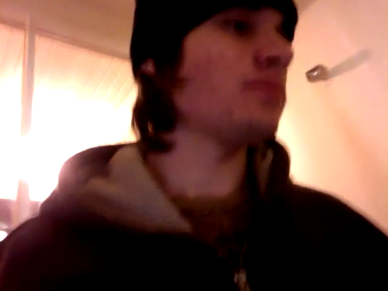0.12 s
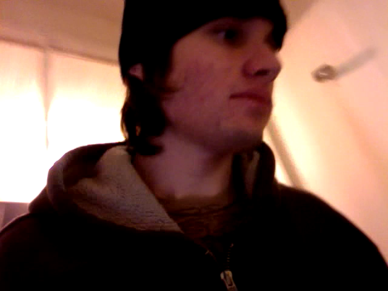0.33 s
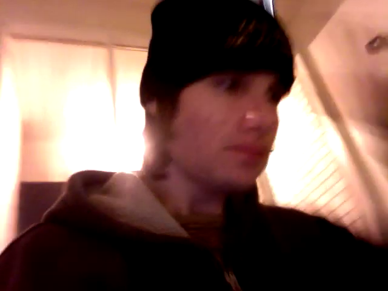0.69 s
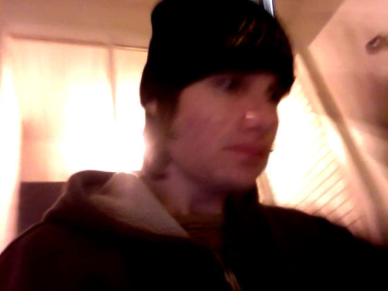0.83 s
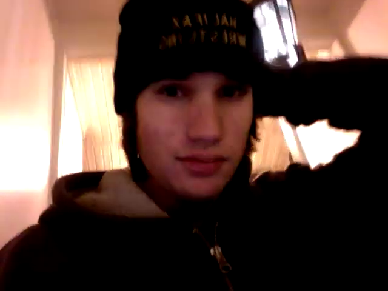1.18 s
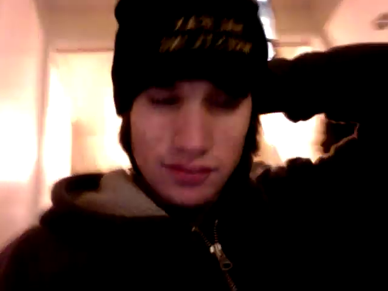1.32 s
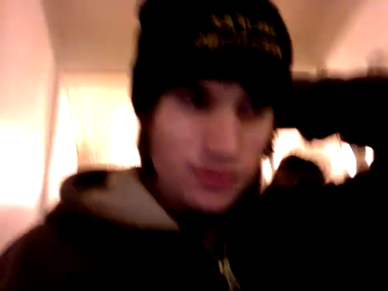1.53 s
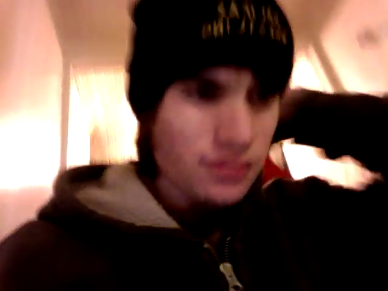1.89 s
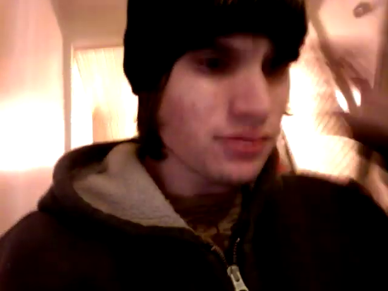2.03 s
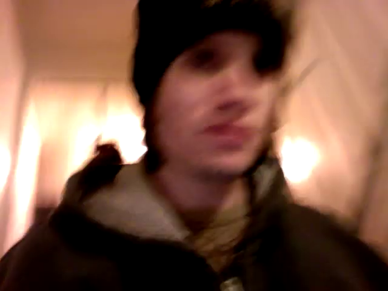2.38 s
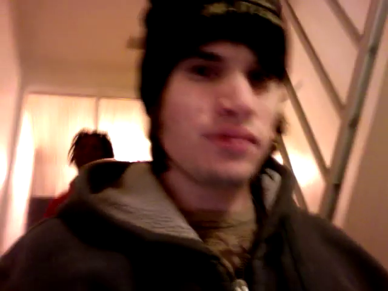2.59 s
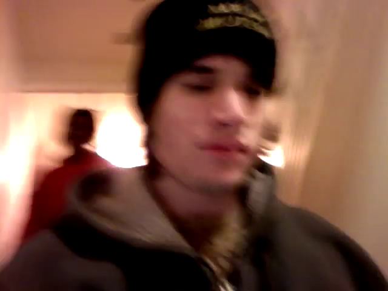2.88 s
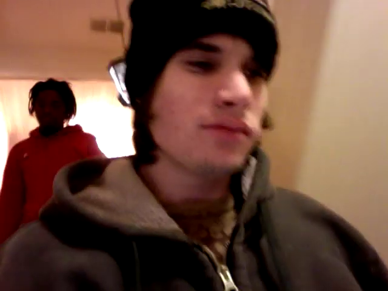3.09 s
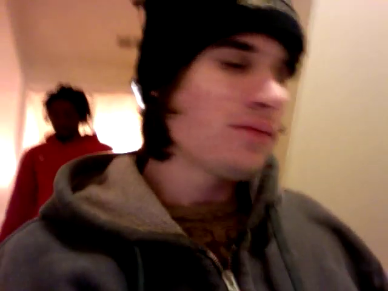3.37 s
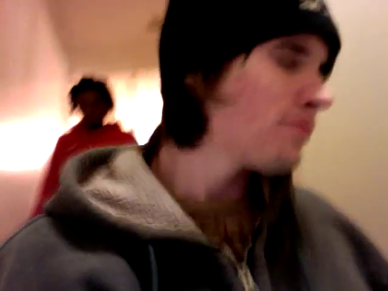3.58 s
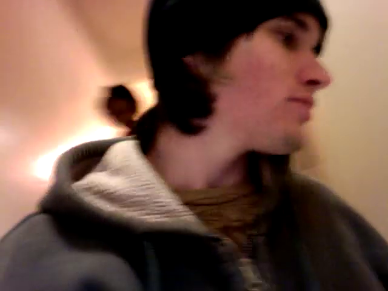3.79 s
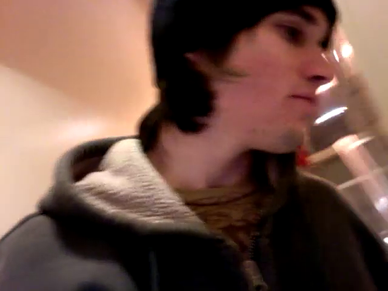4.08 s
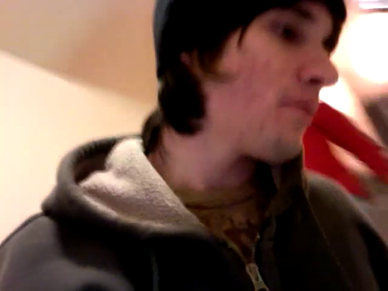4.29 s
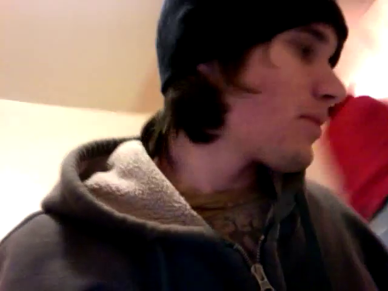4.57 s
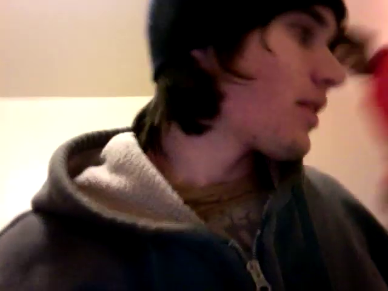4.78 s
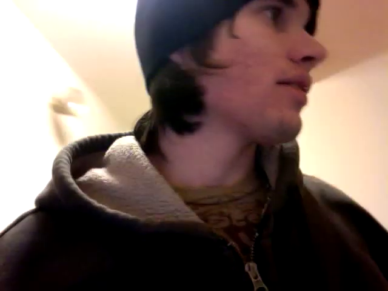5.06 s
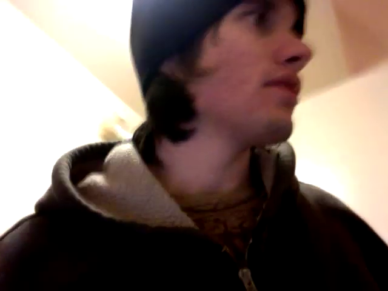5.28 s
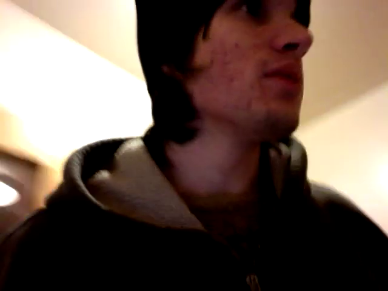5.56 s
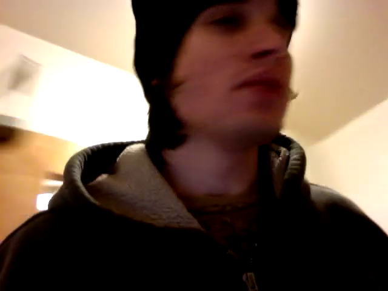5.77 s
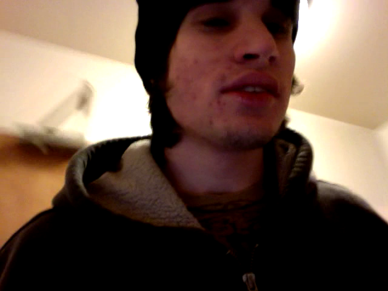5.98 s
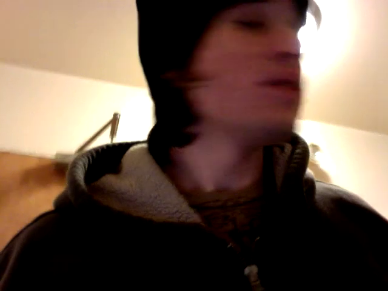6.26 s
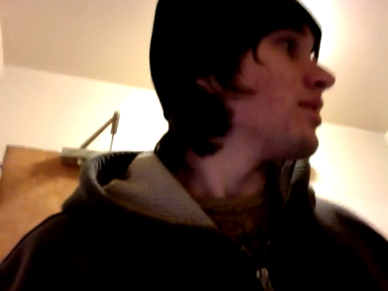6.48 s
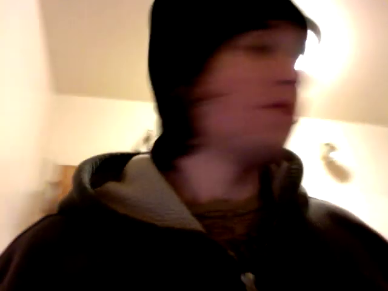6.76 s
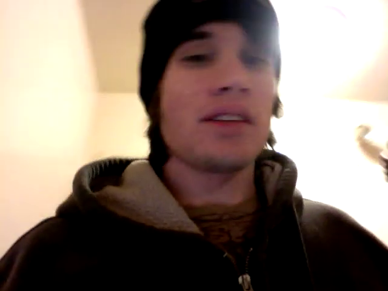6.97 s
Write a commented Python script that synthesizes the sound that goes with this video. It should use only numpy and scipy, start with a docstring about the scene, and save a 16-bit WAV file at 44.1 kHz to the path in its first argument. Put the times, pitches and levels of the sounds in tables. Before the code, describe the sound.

In a narrow bare wooden stairwell, a carried laptop's thin-bass microphone catches two people going down. Faint steady air and clothing rustle lie beneath everything. From 0 to 0.8 s, soft knocks cluster with a low squeak, a higher chirp and light scuffs, with a firmer thud at 0.7. Rasping soles drag around 1.1-1.3. A double knock lands at 1.9, cloth swishes, and a piercing high squeak cuts through at 2.2. Strong paired thumps follow at 2.7, with gritty crackles and a faint zip clink. Uneven steps continue from 3.1; quick chirps and fabric brushes gather near 4, then a click, the broadest swish at 4.45, another high squeak and a heavy low thud at 4.65. Steps tumble closer after 5.2; the loudest hard knock hits at 5.7. Lighter treads, scuffs and small dry ticks follow, ending with a swish and a step at 7.

```python
"""A narrow, bare wooden stairwell: two people go down, one of them carrying a laptop.
Heels ring damped tread modes, noise shudders follow, hard soles clack; filtered slips make scuffs and swishes.
Squeaks and chirps are rough tones, crunches are runs of cracks, case and zip tick, the zip pull clinks.
A decaying noise tail rings after all but the rustle and the faint air; the laptop's microphone thins the bass."""
import sys
import numpy as np
from scipy import signal
from scipy.fft import rfft, irfft, next_fast_len
from scipy.io import wavfile
from scipy.ndimage import uniform_filter1d

SR = 44100
rng = np.random.default_rng(int(sys.argv[2]) if len(sys.argv) > 2 else 0)


def to_wav(sig):
    """Store sig (one row per channel, or 1-D mono) as 16-bit WAV at the path in sys.argv[1].

    Samples outside -1..1 are clipped; the rate is SR.
    """
    pcm = np.clip(np.atleast_2d(sig), -1, 1) * 32767
    pcm = np.round(pcm).astype(np.int16)
    wavfile.write(sys.argv[1], SR, pcm.T)  # frames by channels


N = 314874

# event levels in all tables: loudest short-term rms, before reverberation, mix gain and microphone
# footfalls: [t/s, boom level/dB, boom focus f/Hz, clack level re boom/dB, settling time/s]
STEPS = [(.013, -37.5, 326, -10.5, 0.094), (.085, -35, 157, -8, 0.061), (.283, -33, 352, -14.5, .04),
         (.505, -35, 327, -31, 0.036), (0.599, -39, 204, -32, 0.51), (0.725, -25, 303, -22.5, 0.071),
         (.82, -37.5, 300, -16, .04), (1.071, -30.5, 186, -34, 0.05), (1.313, -26.5, 306, -14, 0.064),
         (1.880, -26, 290, -20, 0.025), (1.894, -26, 330, -23.5, .035), (2.289, -26, 324, -8.5, 0.097),
         (2.698, -22.5, 278, -10.5, 0.075), (2.765, -24.5, 365, -12, 0.088), (3.080, -33, 187, -11, 0.0074),
         (3.492, -25.5, 293, -20.5, 0.077), (3.60, -31, 216, -13.5, 0.13), (3.917, -31, 357, -16.5, 0.1),
         (4.062, -26, 297, -21, 0.075), (4.325, -33, 218, -15, 0.037), (4.647, -22, 158, -27, 0.033),
         (4.783, -33.5, 242, -20, 0.21), (5.177, -31, 190, -40, 0.0152), (5.27, -30, 234, -17, 0.085),
         (5.36, -30.5, 290, -24, 0.087), (5.722, -18, 450, -8.5, 0.079), (5.822, -25.5, 390, -28, 0.051),
         (5.978, -40.5, 500, -28, 0.026), (6.059, -34, 228, -6, 0.028), (6.393, -35.5, 277, -16, 0.046),
         (6.460, -31, 296, -19, 0.062), (6.545, -35.5, 250, -30, 0.079), (7.008, -28, 197, -15.5, 0.078)]
# rubbing spectrum: [f/Hz, density/dB per Hz]
RUB = [(200, 11), (600, 1.5), (1200, 2), (2500, 3.5), (4200, -1.5), (6000, -8), (8500, -17), (12000, -30.5),
       (15500, -47)]

TIME_S = np.arange(N) / SR
BLOW_S = np.arange(int(SR * .8)) / SR  # time axis of one event
PEAK_S = BLOW_S.mean()  # where a stroke peaks on it


def undb(db):
    """Decibels to gain."""
    return 10 ** (np.asarray(db) / 20)


def along(points, hz):
    """Read (Hz, value) points on a log-frequency axis."""
    f, value = np.transpose(points)
    return np.interp(np.log(hz + 1), np.log(f), value)


def bump(f, hz, width_oct, db):
    """Resonance in dB; width is from the centre to half its dB."""
    return db / (1 + (np.log2(f / hz) / width_oct) ** 2)


def colour(x, db_at):
    """Minimum-phase filter with a gain in dB given as a function of frequency."""
    size = 2 * next_fast_len(len(x))
    gain_db = db_at(np.arange(size // 2 + 1) * SR / size + 1)
    cepstrum = irfft(gain_db * np.log(10) / 20)
    # fold the cepstrum to make the filter causal
    cepstrum[1:size // 2] *= 2
    cepstrum[size // 2 + 1:] = 0
    return irfft(rfft(x, size) * np.exp(rfft(cepstrum)))[:len(x)]


def loudest(x, db, size=1024):
    """Scale so that the loudest stretch of size samples has this rms level."""
    peak_power = uniform_filter1d(x ** 2, size, mode="constant").max()
    return x * undb(db) / np.sqrt(peak_power)


def add(track, s, x):
    """Mix a sound into a track from time s on."""
    start = int(s * SR)
    x, start = x[max(-start, 0):], max(start, 0)
    track[start:start + len(x)] += x[:max(N - start, 0)]


def grains(count, spread_db):
    """Dense tiny impacts of unequal size."""
    size_db = spread_db * np.clip(rng.standard_normal(count), -2, 2)
    return rng.standard_normal(count) * undb(size_db)


def walk(count, rate_hz):
    """Random values, rate_hz of them a second, joined by straight lines."""
    position = np.arange(count) / SR * rate_hz
    return np.interp(position, np.arange(4096), rng.standard_normal(4096))


def decay(t60_s):
    """Exponential decay by 60 dB in t60_s."""
    return np.exp(-np.log(1000) * BLOW_S / t60_s)


def stroke(length_s, rise_share):
    """Pressure of a slide that catches quickly, peaks half-way through BLOW_S and dies away."""
    t = BLOW_S - PEAK_S
    rise_s = length_s * rise_share
    catch = 1 / (1 + np.abs(t / rise_s) ** 5.5)
    release = np.exp(-np.abs(t / (length_s - rise_s)) ** 1.12)
    return np.where(t < 0, catch, release)


def nearby(x, count=4, lag_min_s=.0003, lag_max_s=.003, echo_db=-13):
    """Lid, chest and wall comb a sound, differently each time because the laptop moves."""
    lags = (SR * rng.uniform(lag_min_s, lag_max_s, count)).astype(int)
    return x + undb(echo_db) * sum(np.pad(x, (lag, 0))[:len(x)] for lag in lags)


def air(level_db=-48.5, swell_db=1, swell_rate_hz=4.76):
    """Still air of the house and microphone hiss: coloured noise that swells gently."""
    # background spectrum: [f/Hz, density/dB per Hz]
    air_spectrum = [(30, -21), (90, -8.5), (200, 2.5), (450, -5), (1000, -15), (2000, -17.5), (4300, -21),
                    (7000, -36.5), (11000, -47), (15500, -60)]
    x = colour(rng.standard_normal(N), lambda f: along(air_spectrum, f))
    return x / x.std() * undb(level_db + swell_db * walk(N, swell_rate_hz))


def rustle(steady_db=-67, stir_db=-53.5, calm_s=0.077, flutter_db=2, flutter_rate_hz=25):
    """A sweatshirt brushes faintly near the microphone; every step stirs it and it calms again."""
    x = colour(grains(N, spread_db=3), lambda f: along(RUB, f))
    stir = sum((TIME_S > s) * np.exp(-np.abs(TIME_S - s) / calm_s) for s, *_ in STEPS)
    motion = undb(steady_db) + undb(stir_db) * stir
    return x / x.std() * motion * undb(flutter_db * walk(N, flutter_rate_hz))


def footfalls(toe_db=-7, shudder_db=-3, focus_db=4.0, detune=0.038, clack_rise_s=.0012, clack_s=0.049):
    """The heel rings a tread; the flight shudders while the sole settles; a hard sole clacks on top."""
    # tread and the hollow under it, before detuning: [f/Hz, level/dB, t60/s]
    tread_modes = [(107.7, -13, 0.29), (145.2, 2, 0.11), (211.3, -2.5, 0.097), (282.8, -2.5, 0.13),
                   (343.6, -7.5, 0.22), (427.4, -0.5, 0.039), (545, -20, 0.54), (679, -11.5, 0.12)]
    # shudder and hard-heel spectra: [f/Hz, density/dB per Hz]
    boom_spectrum = [(30, -36), (55, -11), (85, 5.5), (135, -12.5), (210, -1), (350, -0.5), (500, -7),
                     (700, -15), (1100, -29.5), (2500, -26), (6000, -66.5)]
    clack_spectrum = [(200, -23), (600, 22), (1000, 12), (1400, 12.5), (2300, 0.5), (4000, -5), (7000, -31),
                      (15000, -56)]
    # bass boost at the usual step level; harder steps gain boom faster than bass
    usual_step_db, usual_weight_db, weight_slope, weight_hz = -28, 1.5, 0.41, 130
    out = np.zeros(N)
    hz, mode_db, t60_s = np.transpose(tread_modes)[:, :, None]
    sign = (-1) ** np.arange(len(hz))[:, None]  # neighbouring modes swing against each other
    for s, db, focus_hz, clack_db, settle_s in STEPS:
        own_hz = hz * (1 + detune * rng.standard_normal(hz.shape))  # no two treads are alike
        modes = sign * undb(mode_db) * np.sin(2 * np.pi * own_hz * BLOW_S) * decay(t60_s)
        ring = np.sum(modes, axis=0)
        toe = int(SR * settle_s * rng.uniform(.3, .8))  # the ball of the foot lands after the heel
        ring = ring + undb(toe_db) * np.pad(ring, (toe, 0))[:len(ring)]
        ring = colour(ring, lambda f: -10 * np.log10(1 + (f / 800) ** 4))  # rubber rounds the blow

        settling = np.exp(-(BLOW_S / settle_s) ** 1.47)
        shudder = colour(grains(len(BLOW_S), spread_db=6.5) * settling, lambda f: along(boom_spectrum, f))

        # body weight drives the lowest modes; where the foot lands decides which range answers
        weight_db = usual_weight_db - weight_slope * (db - usual_step_db)
        boom = colour(loudest(ring, 0) + loudest(shudder, shudder_db),
                      lambda f: weight_db / (1 + (f / weight_hz) ** 4)
                      - focus_db * np.minimum(np.log2(f / focus_hz) ** 2, 4))

        contact = (1 - np.exp(-BLOW_S / clack_rise_s)) * np.exp(-BLOW_S / clack_s)
        clack = colour(grains(len(BLOW_S), spread_db=10.0) * contact, lambda f: along(clack_spectrum, f))
        add(out, s, loudest(boom, db) + loudest(clack, db + clack_db))
    return out


def squeal(length_s, hz, glide=0, rough_db=4.5, second_db=-21, third_db=-35, rise_share=0.37):
    """Stick-slip locks into a rough, unsteady tone with faint overtones; glide in octaves/s."""
    count = len(BLOW_S)
    waver = .056 * walk(count, rate_hz=2000) + .013 * walk(count, rate_hz=250)
    pitch_hz = hz * 2 ** (glide * np.clip(BLOW_S - PEAK_S, -length_s, length_s))
    phase = 2 * np.pi * np.cumsum(pitch_hz * (1 + waver)) / SR
    tone = np.sin(phase) + undb(second_db) * np.sin(2 * phase) + undb(third_db) * np.sin(3 * phase)
    return tone * undb(rough_db * walk(count, rate_hz=150)) * stroke(length_s, rise_share)


def squeaks():
    """Rubber soles squeak around one pitch while they drag and chirp as they flick free."""
    # held squeaks: [t at peak/s, length/s, level/dB, f/Hz]
    squeak_table = [(.12, 0.1, -35.5, 831), (0.543, 0.046, -30.5, 2270), (0.677, 0.05, -43, 2234),
                    (1.875, 0.084, -49, 4590), (1.872, 0.087, -48.5, 2920), (2.189, 0.15, -21, 4260),
                    (2.225, 0.012, -19.5, 4195), (2.267, 0.018, -20.5, 4204), (3.602, .06, -43, 2750),
                    (4.217, 0.045, -36, 1390), (4.394, 0.062, -39.5, 1123), (4.551, 0.16, -31.5, 4260)]
    # sweeping chirps: [t at peak/s, length/s, level/dB, f at peak/Hz, glide/octaves per s]
    chirp_table = [(3.941, 0.024, -33, 3325, -16.5), (3.992, .008, -44, 7450, 14),
                   (4.004, 0.0072, -38, 5500, -22)]
    out = np.zeros(N)
    for s, length_s, db, hz in squeak_table:
        add(out, s - PEAK_S, loudest(squeal(length_s, hz), db))
    for s, length_s, db, hz, glide in chirp_table:
        add(out, s - PEAK_S, loudest(squeal(length_s, hz, glide), db))
    return out


def slide(pressure, hz, peak_db, tilt_db, width_oct=0.36,
          judder_db=2, judder_rate_hz=160, shift_db=2, shift_rate_hz=45):
    """Sliding is a run of tiny slips, in uneven bunches, that ring one broad resonance."""
    count = len(BLOW_S)
    edges_hz = np.geomspace(400, 16000, 16)
    slips = np.zeros(count)
    # the patch in contact keeps changing, so each band comes and goes by itself
    for pair in zip(edges_hz, edges_hz[1:]):
        band = signal.butter(2, pair, "band", fs=SR, output="sos")
        part = signal.sosfilt(band, grains(count, spread_db=7.5))
        slips += part * undb(shift_db * walk(count, shift_rate_hz))
    slips = slips * undb(judder_db * walk(count, judder_rate_hz)) * pressure
    return colour(nearby(slips), lambda f: along(RUB, f) + bump(f, hz, width_oct, peak_db)
                  + tilt_db * np.log2(np.maximum(f / 1000, 1)))


def scuffs(rise_share=0.24):
    """A sole catches quickly and rasps around its own resonance."""
    # soles on treads: [t at peak/s, length/s, level/dB, resonance f/Hz, resonance/dB,
    # tilt above 1 kHz/dB per octave]
    scuff_table = [(0.125, 0.09, -32.5, 1490, 19.5, 5.5), (0.542, 0.05, -32.5, 1900, 18, -1.5),
                   (.555, 0.1, -37.5, 5500, 9, 1), (0.673, 0.046, -42.5, 4800, 2, 1),
                   (1.082, 0.05, -29.5, 2310, 6, -6), (1.217, 0.052, -27.5, 1570, 14.5, 0.5),
                   (1.245, 0.17, -28, 1880, 20.5, -2), (3.266, 0.058, -37.5, 2930, 16, 0.5),
                   (3.943, 0.017, -34, 3220, 16, 7), (3.975, 0.046, -36, 2280, -2, -1.5),
                   (4.205, 0.041, -36.5, 1310, 30, 10.5), (5.297, 0.12, -33.5, 1360, 7.5, -8),
                   (5.381, 0.071, -33.5, 2450, 8, 0.5), (5.717, 0.045, -27, 1340, 10, -4),
                   (5.866, 0.025, -33.5, 1330, 13, -3.5), (6.105, 0.027, -29, 1410, 19, 2)]
    out = np.zeros(N)
    for s, length_s, db, hz, peak_db, tilt_db in scuff_table:
        rasp = slide(stroke(length_s, rise_share), hz, peak_db, tilt_db)
        add(out, s - PEAK_S, loudest(rasp, db))
    return out


def swishes(rise_share=0.34, cloth_hz=2860, cloth_db=2.5):
    """Cloth slides on cloth as a limb swings: a slower swell with hardly any resonance."""
    # clothes: [t at peak/s, length/s, level/dB, tilt above 1 kHz/dB per octave]
    swish_table = [(0.293, 0.065, -42.5, -0.5), (0.668, 0.11, -35, -2), (1.913, 0.07, -46, -0.5),
                   (2.053, 0.14, -29, 0), (2.21, 0.24, -29.5, 4), (2.386, 0.058, -31, -3),
                   (2.79, 0.2, -48, 9), (3.632, 0.07, -34, 3), (4.021, 0.073, -31.5, 5.5),
                   (4.088, 0.072, -31.5, -1), (4.456, 0.12, -25, 2.5), (4.822, 0.096, -32, -0.5),
                   (4.919, 0.11, -39, -0.5), (6.098, 0.057, -33, 3.5), (6.5, .1, -41, -0.5),
                   (6.613, 0.042, -31.5, 2), (6.97, 0.15, -29.5, 1.5), (7.033, 0.19, -42.5, 7)]
    out = np.zeros(N)
    for s, length_s, db, tilt_db in swish_table:
        swish = slide(stroke(length_s, rise_share), cloth_hz, cloth_db, tilt_db)
        add(out, s - PEAK_S, loudest(swish, db))
    return out


def crunches(rate_hz=220, crack_s=0.0013, slope_db=9, spread_db=4):
    """Grit and joints under a loaded foot: separate little cracks, weakening as it comes to rest."""
    # crunches: [t/s, length/s, level/dB, f/Hz]
    crunch_table = [(1.054, 0.036, -33, 1090), (2.716, 0.11, -37, 2060), (2.792, 0.047, -39, 2730),
                    (4.021, .04, -37.5, 3480), (4.074, 0.037, -37.5, 2700), (5.367, 0.086, -40.5, 2390),
                    (5.736, 0.049, -46, 2220)]
    out = np.zeros(N)
    count = len(BLOW_S)
    for s, length_s, db, hz in crunch_table:
        cracks = (rng.random(count) < rate_hz / SR) * undb(spread_db * rng.standard_normal(count))
        cracks[0] = 1
        cracks = cracks * np.exp(-(BLOW_S / length_s) ** 2)
        bursts = signal.lfilter([1], [1, -np.exp(-1 / (crack_s * SR))], cracks)  # each crack decays
        crunch = colour(bursts * rng.standard_normal(count),
                        lambda f: -slope_db * np.minimum(np.log2(f / hz) ** 2, 6))
        add(out, s, loudest(crunch, db, size=512))
    return out


def ticks(decay_s=0.0016, slope_db=9, peak_db=6, width_oct=0.75, dull_hz=7500):
    """Small hard contacts of zip and laptop case: noise snaps resonating around their own pitch."""
    # ticks: [t/s, level/dB, f/Hz]
    tick_table = [(1.995, -51, 7500), (3.098, -50, 7300), (3.263, -49.5, 6560), (3.616, -35, 4000),
                  (4.204, -28.5, 1440), (5.733, -25, 2130), (5.865, -46, 5760), (6.266, -38.5, 3850),
                  (6.467, -46, 3970), (6.487, -40.5, 3900), (6.506, -49, 5800), (6.534, -36.5, 2220),
                  (6.598, -37, 2660), (6.885, -40, 2360), (6.902, -29, 2430)]
    out = np.zeros(N)
    for s, db, hz in tick_table:
        snap = rng.standard_normal(len(BLOW_S)) * np.exp(-BLOW_S / decay_s)
        tick = colour(snap, lambda f: bump(f, hz, width_oct, peak_db)
                      - slope_db * np.abs(np.log2(f / hz))
                      - 10 * np.log10(1 + (f / dull_hz) ** 6))
        add(out, s, loudest(nearby(tick), db, size=256))
    return out


def clinks(scatter_db=3):
    """The metal zip pull swings against its slider and rings its modes for an instant."""
    # clinks: [t/s, level/dB]
    clink_table = [(2.711, -52), (3.620, -43.5), (4.627, -63), (6.1, -42), (6.391, -52), (6.407, -59)]
    # zip pull modes: [f/Hz, level before scatter/dB, t60/s]
    pull_modes = [(6700, 8, .014), (9000, -2.5, 0.013), (10340, -1.5, 0.013), (11400, 1.5, 0.017),
                  (12000, -7, .018), (13500, -8, .015)]
    out = np.zeros(N)
    hz, mode_db, t60_s = np.transpose(pull_modes)[:, :, None]
    for s, db in clink_table:
        strength = undb(mode_db + scatter_db * rng.standard_normal(hz.shape))
        ring = np.sum(strength * np.sin(2 * np.pi * hz * BLOW_S) * decay(t60_s), axis=0)
        add(out, s, loudest(nearby(ring), db, size=256))
    return out


def stairwell(x, wet_db, build_s=0.0021):
    """Add the diffuse ring of the walls: noise whose octaves each have their own decay."""
    # reverberation: [f/Hz, t60/s]
    well_decay = [(100, 0.4), (300, 0.5), (700, 0.82), (2000, 0.58), (4500, 0.35), (8000, 0.15),
                  (15000, 0.094)]
    count = len(BLOW_S)
    hz = np.arange(count // 2 + 1) * SR / count + 1
    noise = rfft(rng.standard_normal(count))
    tail = np.zeros(count)
    for centre_hz in 62.5 * 2 ** np.arange(9):
        weight = np.clip(1 - np.abs(np.log2(hz / centre_hz)), 0, 1)
        tail += irfft(noise * weight, count) * decay(along(well_decay, centre_hz))
    tail = tail * (1 - np.exp(-BLOW_S / build_s))
    tail = tail / np.sqrt(np.sum(tail ** 2))
    return x + undb(wet_db) * signal.fftconvolve(x, tail)[:N]


def scene():
    """Mix the sources, each group with its own share of reverberation; rustle and air stay dry."""
    steps = undb(2.5) * stairwell(footfalls(), wet_db=-6.5)
    squeals = undb(-5.0) * stairwell(squeaks(), wet_db=-3)
    soles = stairwell(scuffs() + crunches(), wet_db=-11)
    clothes = undb(-2.17) * stairwell(swishes(), wet_db=-10.5)
    small = stairwell(ticks() + clinks(), wet_db=-7)
    return (air() + rustle() + steps + squeals + soles + clothes + small)[None]


def record(dry, bass_hz=58, top_hz=15400):
    """The laptop's microphone thins the bass, and the top is cut."""
    thin = signal.sosfilt(signal.butter(1, bass_hz, "high", fs=SR, output="sos"), dry)
    return signal.sosfilt(signal.ellip(8, .2, 70, top_hz, fs=SR, output="sos"), thin)


dry = scene()
out = record(dry)
to_wav(out)
```